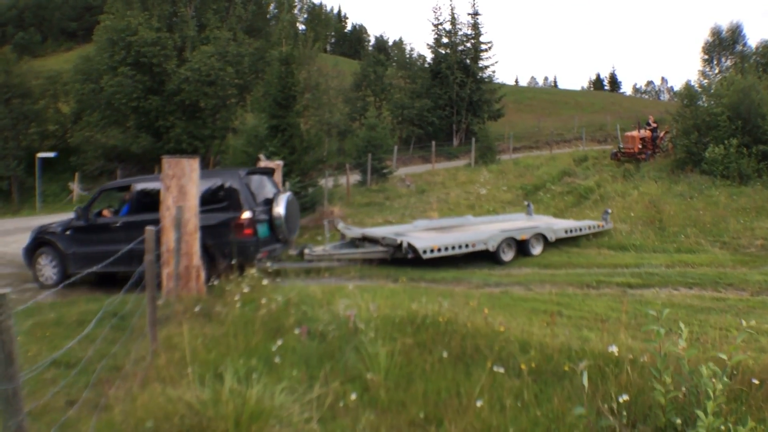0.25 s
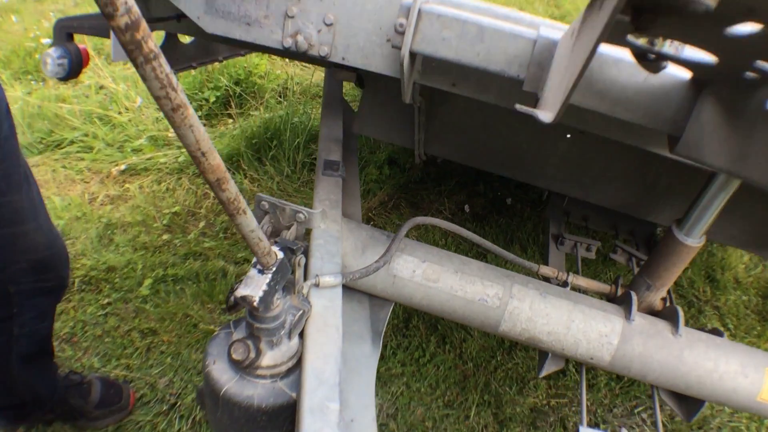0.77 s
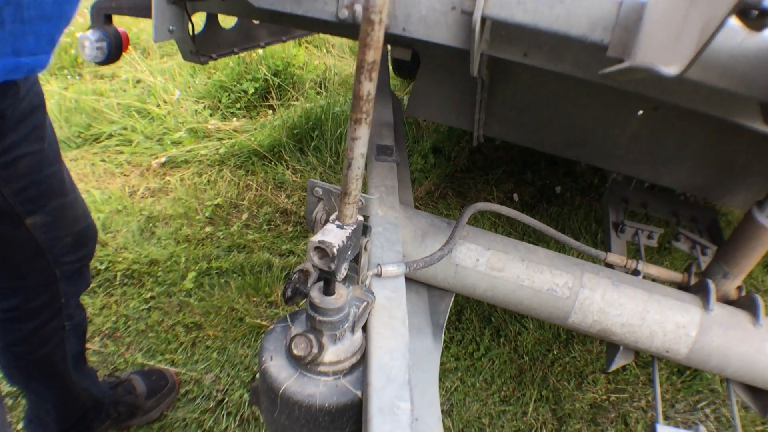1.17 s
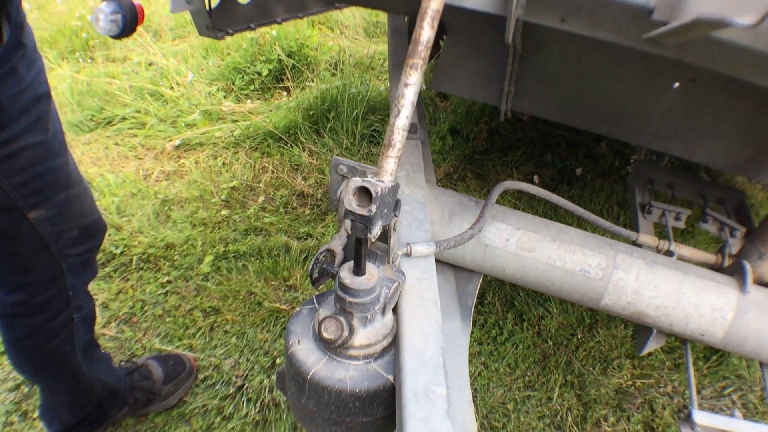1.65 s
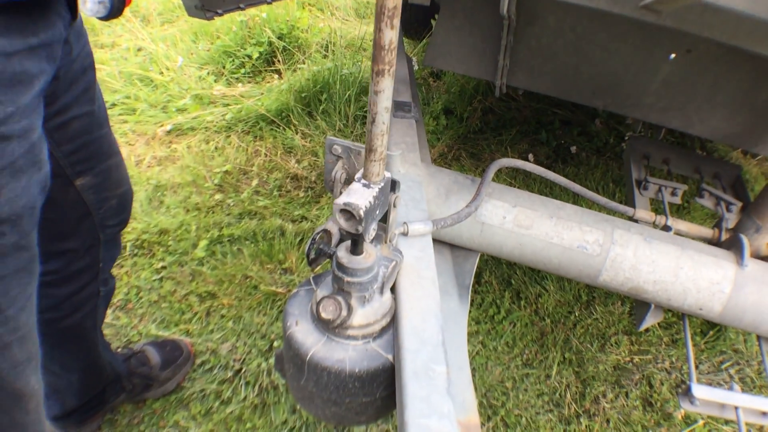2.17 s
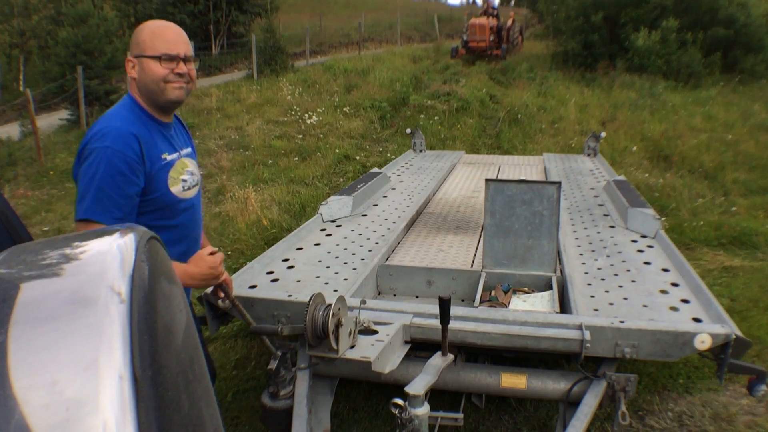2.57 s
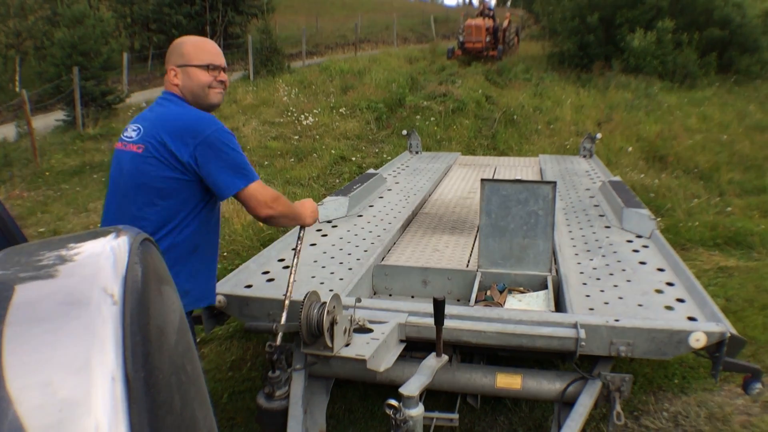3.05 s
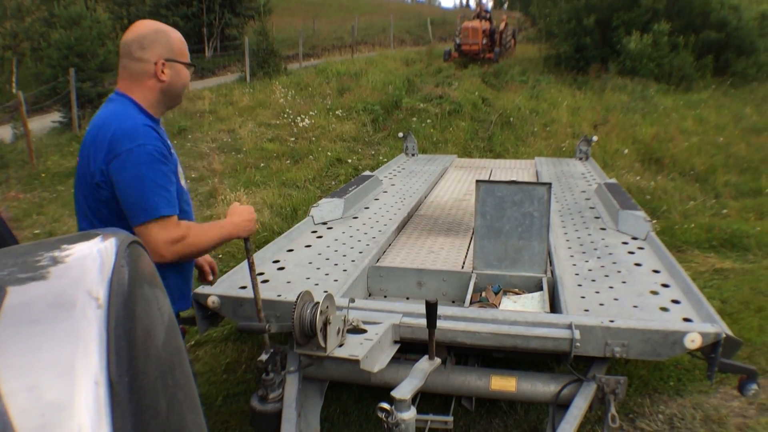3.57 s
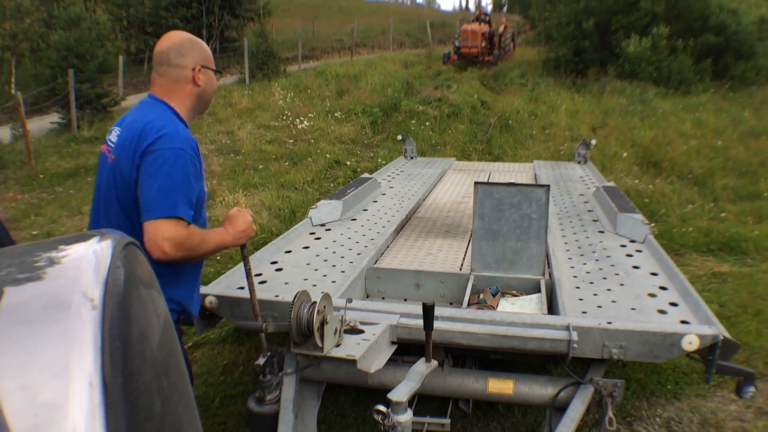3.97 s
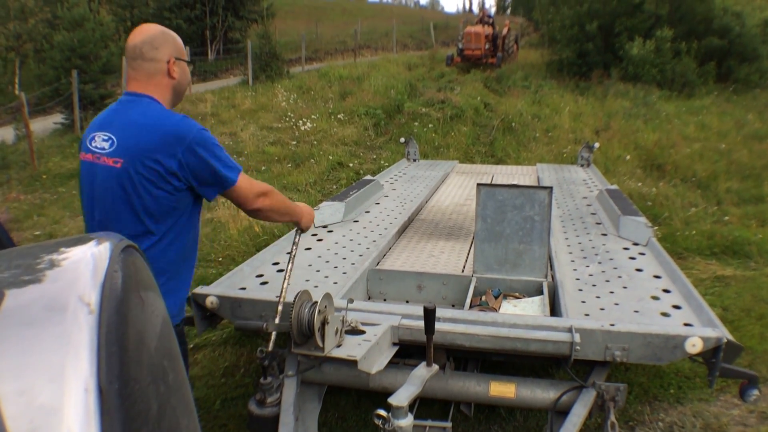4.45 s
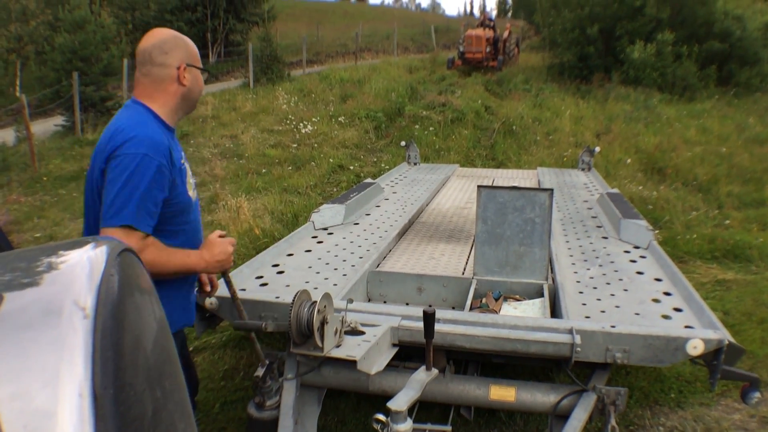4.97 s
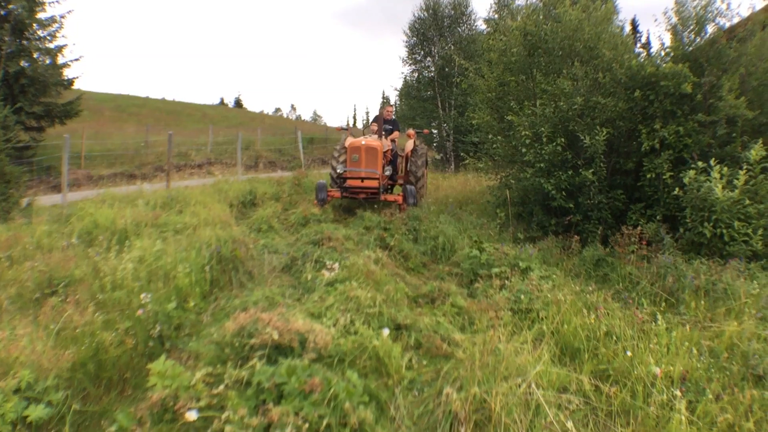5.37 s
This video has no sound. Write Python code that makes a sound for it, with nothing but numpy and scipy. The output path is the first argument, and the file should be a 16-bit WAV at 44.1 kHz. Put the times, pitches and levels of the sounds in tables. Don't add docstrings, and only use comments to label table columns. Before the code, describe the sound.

At 0 s the tail of a heavy blow rings through a steel trailer, with rattling loose parts and low engine thumps, fading by about 0.7 s. From 0.5 s a hydraulic hand pump is worked close by. The first push squeals piercingly around 5 kHz, falling in pitch, and a clank follows near 0.77 s. Oil hisses and chatters like a fast buzz, swelling with each stroke. Lower, weaker squeaks come on the pulls near 1.25, 2.95 and 4.1 s; higher squeals on the pushes near 1.9, 2.45, 3.6 and 4.65 s, with a very shrill one at 4.2 s. Knocks and bright pin ticks mark the reversals, notably at 1.57, 2.1, 2.6, 3.36, 3.8, 4.47, and strongest at 4.84 and 4.98 s. Faint wind, creaking steel and, from about 2.8 s, a barely audible distant idling engine remain underneath. A weak last squeak and tap close it by 5.4 s. The open air adds no room echo.

```python
import sys
import numpy as np
from scipy import signal
from scipy.fft import rfft, irfft
from scipy.io import wavfile
from scipy.ndimage import uniform_filter1d

SR = 44100
rng = np.random.default_rng(int(sys.argv[2]) if len(sys.argv) > 2 else 0)


def dump_mix(stems):
    frames = np.atleast_2d(stems).T
    limited = np.clip(frames, -1, 1)
    pcm = np.round(limited * 32767).astype(np.int16)
    wavfile.write(sys.argv[1], SR, pcm)


def voltage_ratio(level):
    return 10 ** (np.asarray(level, float) / 20)


N = 247401
T = np.arange(N) / SR
# [f/Hz, level/dB]
LOW = [(13, -38), (22, -20.5), (59, 7), (103, 3.5), (146, 0.5), (249, -17.5), (300, -6.5), (390, -47.5),
       (660, -120)]


def squeals():
    # [f/Hz, level/dB, t60/s]
    frame_modes = [(3778, -3, .25), (3915, -9, 0.18), (4190, -4.5, 0.27), (4230, -6, 0.3), (4580, 1, 0.23),
                   (4680, -2.5, 0.16), (4880, -1, 0.16), (5070, 0, 0.23), (5130, -4.5, 0.21),
                   (5275, -5, 0.12), (5430, 0.5, 0.22), (6140, -7, .3), (6350, -11, 0.31),
                   (10300, 1.5, 0.14)]
    dry_tones = pivot_tones() + groans()
    t = np.arange(SR // 3) / SR
    frame = np.zeros(len(t))
    for hz, db, t60 in frame_modes:
        pair = np.cos(2 * np.pi * hz * t) + voltage_ratio(-9) * np.cos(2 * np.pi * 1.006 * hz * t)
        frame += voltage_ratio(db - 60 * t / t60) * pair * 2 * np.log(1000) / (t60 * SR)
    scatter = burst([[(6600, -3.5), (9000, -7.5)]], t, 0.16, 0.00299)
    scatter /= np.linalg.norm(scatter)
    steel_response = voltage_ratio(1.0) * frame + voltage_ratio(-7.0) * scatter
    return voltage_ratio(-1.0) * dry_tones + signal.fftconvolve(dry_tones, steel_response)[:N]


def pivot_tones():
    # [t/s, f/Hz]
    push_curves = [
        [(.554, 5330), (.57, 5514), (.586, 5250), (.61, 5282), (.648, 5276), (.682, 5082), (.69, 4887),
         (.703, 4490)],
        [(1.79, 5307), (1.865, 5254)],
        [(1.894, 5293), (1.934, 5275), (1.942, 5205), (1.975, 5222)],
        [(2.402, 5280), (2.42, 5310), (2.426, 5420), (2.439, 5420), (2.445, 5270), (2.47, 5186), (2.493, 5275),
         (2.517, 5170), (2.574, 4715)],
        [(3.552, 5250), (3.567, 5290), (3.573, 5440), (3.582, 5413), (3.586, 5250), (3.645, 5170), (3.7, 4904),
         (3.723, 4880), (3.752, 4420)],
        [(4.612, 4950), (4.628, 5105), (4.65, 5160), (4.668, 5316), (4.7, 5310)],
    ]
    # [t/s, f/Hz]
    pull_curves = [
        [(1.213, 4050), (1.24, 4000), (1.252, 3905), (1.264, 3943), (1.3, 3894)],
        [(2.271, 4100), (2.302, 4130)],
        [(2.909, 4100), (2.922, 3910), (2.934, 3950), (2.946, 3916), (2.966, 3840), (2.98, 4010), (2.985, 3807),
         (3.03, 3763), (3.11, 3863)],
        [(4.041, 3940), (4.051, 3968), (4.085, 3900), (4.103, 3890), (4.112, 4170), (4.125, 4075), (4.2, 4075),
         (4.275, 4065)],
        [(4.198, 6280), (4.212, 6425), (4.238, 6372), (4.25, 6585), (4.262, 6470), (4.285, 6470)],
        [(5.141, 4090), (5.155, 3980), (5.177, 3875), (5.213, 3976), (5.26, 3915)],
        [(5.252, 4140), (5.265, 4236), (5.3, 4200), (5.33, 4240), (5.39, 4230)],
    ]
    # [t/s, level/dB, rise/s, fall/s], rise and fall over 20 dB
    grips = [(.566, -38, 0.012, 0.13), (0.604, -14.5, 0.015, 0.032), (0.64, -13, 0.04, 0.11),
             (0.655, -12.5, 0.05, 0.06), (0.686, -15.5, 0.03, 0.019), (1.224, -26, 0.006, 0.034),
             (1.248, -22.5, 0.012, 0.02), (1.265, -22.5, 0.04, 0.014), (1.295, -43, .02, 0.024),
             (1.824, -29, 0.033, 0.019), (1.915, -13, 0.013, 0.055), (1.931, -16, 0.024, 0.02),
             (1.958, -23, .03, 0.024), (2.278, -51.5, 0.056, 0.05), (2.416, -25.5, 0.012, 0.11),
             (2.432, -24.5, .03, 0.012), (2.449, -21, 0.015, 0.029), (2.488, -18.5, 0.017, 0.061),
             (2.565, -31.5, 0.2, 0.065), (2.924, -33, 0.013, 0.051), (2.968, -37.5, .03, 0.034),
             (2.988, -33, 0.008, 0.023), (3.013, -38.5, 0.022, 0.032), (3.05, -49, 0.039, 0.027),
             (3.568, -19, .015, 0.033), (3.581, -12, 0.014, 0.056), (3.597, -10.5, 0.028, 0.038),
             (3.622, -18, .03, 0.012), (3.658, -18, 0.041, 0.06), (3.73, -28, 0.24, 0.27),
             (4.05, -37, 0.021, 0.23), (4.115, -31.5, .02, 0.066), (4.168, -27.5, 0.022, 0.056),
             (4.197, -39, .03, 0.086), (4.213, -20, .007, .03), (4.227, -10.5, 0.02, 0.016),
             (4.251, -24, .02, 0.014), (4.27, -14.5, 0.011, 0.011), (4.63, -15.5, 0.013, 0.024),
             (4.653, -16, 0.023, 0.023), (4.669, -7.5, 0.009, 0.012), (5.154, -36.5, 0.0075, 0.049),
             (5.19, -36, 0.048, 0.025), (5.214, -31, 0.043, 0.082), (5.269, -40, .02, .04),
             (5.3, -33.5, .035, 0.032), (5.36, -56, .04, 0.03)]
    # [f/Hz, second/dB, third/dB, growth/dB per dB of bite]
    overtones = [(3996, -11, -27.5, -0.22), (4130, -14.5, -30, 0.1), (4865, -7, -20, 1.5),
                 (5080, -29.5, -30, 0.5), (5420, -29, -48.5, -0.27), (5420, -34, -42, -0.5),
                 (6400, -22.5, -64, -0.5)]
    smooth_s = .006
    out = np.zeros(N)
    curves = sorted(push_curves + pull_curves)
    starts = [curve[0][0] for curve in curves]
    owner = np.searchsorted(starts, [grip[0] for grip in grips]) - 1
    for k, curve in enumerate(curves):
        t = np.arange(starts[k], curve[-1][0], 1 / SR)
        hz = uniform_filter1d(column(curve, index=1, t=t), size=round(smooth_s * SR / 2))
        db = uniform_filter1d(swells(np.array(grips)[owner == k], t), size=round(smooth_s * SR))
        upper_db = db + column(overtones, index=3, t=hz) * (db + 19)
        second_db = upper_db + column(overtones, index=1, t=hz)
        third_db = upper_db + column(overtones, index=2, t=hz)
        partials_db = [db, second_db, third_db, third_db - 6.5]
        if hz[0] < 4500:
            tone = slip(hz, partials_db, flutter_db=2.2, wobbles=.002)
        else:
            tone = slip(hz, partials_db)
        add(out, starts[k], tone)
    return out


def groans():
    # [t/s, length/s, f/Hz, level/dB]
    groan_events = [
        (3.045, 0.029, 1790, -59),
        (3.427, 0.035, 1066, -43),
        (4.187, 0.086, 1065, -60),
        (4.193, 0.046, 1572, -60.5),
        (5.247, 0.075, 1760, -71),
    ]
    out = np.zeros(N)
    for start, length, hz, db in groan_events:
        u = np.arange(0, 1, 1 / (length * SR))
        level_db = db + abs(2 * u ** 0.51 - 1)
        add(out, start, slip(hz + 0 * u, [level_db], flutter_db=2.5, wobbles=.012))
    return out


def slip(hz, partials_db, flutter_db=.4, wobbles=.0005):
    wobble = wander(SR // 4, 200)[:len(hz)]
    flutter = wander(SR // 4, 200)[:len(hz)]
    turns = 2 * np.pi * np.cumsum(hz * (1 + wobbles * wobble)) / SR
    tone = np.zeros(len(hz))
    for k, db in enumerate(partials_db):
        partial_flutter_db = flutter_db + 2.6 * min(k, 1)
        tone += voltage_ratio(db + partial_flutter_db * flutter) * np.sin((k + 1) * turns)
    return np.sqrt(2) * tone * signal.windows.tukey(len(hz), .1)


def oil():
    # [f/Hz, level/dB]
    jet = [(1500, -29), (3200, -10.5), (4600, -1.5), (5200, -1.5), (5900, -4.5), (6700, -3), (7400, -6),
           (8200, -4.5), (8800, -6.5), (9500, -5.5), (10400, -23.5), (12800, -39.5), (14000, -17),
           (16000, -22)]
    # [f/Hz, half width/Hz, level/dB]
    hose_peaks = [(3500, 130, -1.5), (5900, 150, 10.5), (7400, 320, 3.5), (8500, 350, 8)]
    # [f/Hz, level/dB]
    spray = [(8500, -18), (10500, -2), (12500, -23.5), (14000, -8)]
    rate, clean, flow_db = lever()
    clean = np.clip(clean, 0, 1)
    colour_wander, patches = wander(N, 1500), wander(N, 1500)
    turns = 2 * np.pi * np.cumsum(rate) / SR
    pulses = sum(np.cos(k * turns + 0.015 * k * k) for k in range(5, 48))
    drive = clean * evened(pulses) + np.sqrt(1 - clean ** 2) * rng.standard_normal(N)
    hz, colour_db = steel(2.2, 140).T
    colour_db = colour_db + read(jet, hz)
    for peak_hz, width_hz, db in hose_peaks:
        colour_db += db * np.exp(-((hz - peak_hz) / width_hz) ** 2)
    stretch = (rate / 325) ** 0.27 * (1 + .015 * colour_wander)
    hose = coloured(drive, np.transpose([hz, colour_db]), stretch)
    spray_db = np.where(T < 2.42, -12, -22)
    hose += voltage_ratio(spray_db) * lumpy(spray, 1.5, size=600)
    return voltage_ratio(flow_db + 2.4 * patches + 9.5) * hose * np.clip((T - .4) / 0.1, 0, 1)


def lever():
    # [t/s, length/s, top chatter rate/Hz, clean share 0-1, oil flow/dB]
    pushes = [
        (.49, .28, 318, .72, -64),
        (1.62, .405, 280, .55, -65.5),
        (2.31, .3, 313, .78, -71),
        (3.41, .36, 320, .82, -66),
        (4.51, .33, 328, .9, -64.5),
    ]
    # [t/s, length/s, top chatter rate/Hz, clean share 0-1, oil flow/dB]
    pulls = [
        (.78, .22, 260, .1, -71),
        (2.13, .225, 325, .4, -60),
        (2.75, .46, 329, .76, -64),
        (3.92, .44, 331, .7, -63),
        (5.01, .42, 335, .66, -67),
        (.96, .505, 305, .62, -61.5),
    ]
    rest_hz, rest_clean = 184.4, .08
    start, length, top_hz, top_clean, db = np.transpose(pushes + pulls)[:, :, None]
    u = np.clip((T - start) / length, 0, 1)
    after = np.maximum(T - start - length, 0)
    push = np.sin(np.pi / 2 * np.minimum(u / .55, 1)) * np.clip(1 - after / .06, 0, 1)
    pull = abs(np.sin(np.pi * u ** 1.25)) ** .55
    pushing = np.arange(len(u))[:, None] < len(pushes)
    speed = np.where(pushing, push, pull)
    rate = rest_hz + (top_hz - rest_hz) * speed
    clean = rest_clean + (top_clean - rest_clean) * speed ** 2
    drain_db = 400 * np.maximum(start - T, after)
    flow_db = db - 9.5 * (1 - speed) - drain_db
    return rate.max(0), clean.max(0), flow_db.max(0)


def whistle():
    # [t/s at the top, f/Hz, level/dB]
    arches = [
        (0.795, 15650, -59),
        (.95, 14750, -66),
    ]
    reach_s, sag_hz_per_s2, fade_db_per_s2 = 0.085, 260000, 898
    s, top_hz, db = np.transpose(arches)[:, :, None]
    jitter = evened(uniform_filter1d(rng.standard_normal(N), size=100))
    hz = (top_hz - sag_hz_per_s2 * (T - s) ** 2).max(0) + 60 * jitter
    heard = (T > s.min() - reach_s) & (T < s.max() + reach_s)
    broken_db = 5 * evened(uniform_filter1d(rng.standard_normal(N), size=300)) - 5
    level_db = broken_db + (db - fade_db_per_s2 * (T - s) ** 2).max(0)
    return heard * np.sqrt(2) * voltage_ratio(level_db) * np.sin(2 * np.pi * np.cumsum(hz) / SR)


def linkage():
    return clanks() + plate_rings() + pin_ticks()


def clanks():
    # [t/s, body/dB, bright/dB above body, thump/dB above body]
    knocks = [(0.725, -52.5, -3, -8), (0.765, -25, -28, -13.5), (0.878, -35.5, -12, -5),
              (1.056, -53, -24, 6), (1.255, -47, -33, -11), (1.582, -35, -13.5, -6.5),
              (1.759, -64.5, -5, -2), (1.859, -45, -19, 5), (2.094, -36.5, -22, -1),
              (2.469, -44.5, -39, -10), (2.615, -32, -30, -16), (2.729, -41, -35, -4),
              (3.054, -45.5, -16, -16), (3.165, -39, -14, -11), (3.364, -31.5, -16.5, -7.5),
              (3.77, -29, -29, -11), (3.887, -30.5, -15, -6.5), (4.288, -34, -9.5, -11),
              (4.452, -42.5, -16, -16.5), (4.48, -36.5, -9.5, -4), (4.839, -24, -21, -13),
              (4.976, -29.5, -22, -13), (5.383, -48, -23, -26)]
    # [f/Hz, level/dB, t60/s]
    deck = [(364.3, 4, 0.62), (474, 4, 0.32), (895, 5.5, 0.52), (1111, 7.5, 0.58), (1250, -9, 0.16),
            (1625, -26, 0.27), (1770, -0.5, 0.96), (2115, 1, 0.17)]
    # [f/Hz, level/dB]
    body_colour = [(150, -49), (250, -21.5), (355, -36.5), (642, -0.5), (1130, -1.5), (2050, -8.5),
                   (2460, -14), (3710, -17.5), (4500, -50.5), (5850, -57.5), (9900, -120)]
    # [f/Hz, level/dB]
    bright_colour = [(2060, -13), (3500, -12), (5270, -9), (7850, -14), (10000, -42), (13000, -64),
                     (22000, -120)]
    # [f/Hz, level/dB]
    thump_colour = [(50, -23.5), (110, 7.5), (250, 1), (400, 4.5), (700, -41.5)]
    out, t = np.zeros(N), np.arange(SR // 2) / SR
    for s, db, bright_db, thump_db in knocks:
        plate, pins = steel(4, 60), steel(3, 200)
        body = burst([body_colour, plate], t, 0.32, 0.0003)
        body += voltage_ratio(-12.5) * burst([body_colour, plate], t, 0.8, 0.0029)
        body += voltage_ratio(1.0) * ring(deck, t, .4, 12) * (1 - np.exp(-t / 0.00027))
        body += voltage_ratio(thump_db + 9.0) * burst([thump_colour], t, 0.57, 0.05)
        bright = burst([bright_colour, pins], t, 0.18, 0.00033)
        add(out, s, voltage_ratio(db - 10.5) * (body + voltage_ratio(bright_db + 18.0) * bright))
    return out


def plate_rings():
    # [t/s, level/dB, f/Hz]
    plates = [(0.766, -22, 1240), (0.877, -34, 1190), (1.583, -30, 707), (2.1, -30, 760),
              (2.614, -31, 1350), (3.165, -41, 920), (3.364, -28.5, 880), (3.77, -28, 1860),
              (3.887, -31, 970), (4.288, -35, 1050), (4.48, -29.5, 950), (4.839, -24.5, 1890),
              (4.977, -26.5, 786)]
    out, t = np.zeros(N), np.arange(SR // 2) / SR
    for s, db, hz in plates:
        peak = [(hz / 1.9, -40), (hz, 0), (hz * 1.47, -40)]
        add(out, s, voltage_ratio(db - 14.0) * burst([peak], t, 0.27, 0.006))
    return out


def pin_ticks():
    # [t/s, level/dB, ring f/Hz, top/dB above level, top ring f/Hz]
    tick_events = [(0.849, -32.5, 6140, -25, 11040), (0.8796, -32.5, 6020, -14, 11040),
                   (1.0067, -50, 6840, 0, 14230), (1.5494, -33.5, 5920, -6, 15000),
                   (1.574, -33.5, 3770, -9, 14230), (2.0824, -21, 5900, -14, 14230),
                   (2.183, -37, 6070, -4, 14230), (2.384, -64, 5000, -10, 11040),
                   (2.707, -33.5, 7700, -12, 14230), (3.3565, -35, 5100, -1.5, 14230),
                   (3.374, -26.5, 5160, -16, 14230), (3.86, -26.5, 7800, -26, 14230),
                   (3.8688, -26, 5900, -2, 11040), (4.4495, -48, 9500, -6, 14000),
                   (4.471, -32, 5510, -3, 14400), (4.4727, -23.5, 4840, -16, 9500),
                   (4.954, -33, 7870, -21, 14230), (4.977, -33.5, 3450, -19, 9450)]
    # [f/Hz, level/dB]
    tick_colour = [(1470, -12), (2500, -14.5), (2940, -12.5), (5410, -3), (6000, 5), (10000, -14.5),
                   (13000, -67), (22000, -120)]
    # [f/Hz, level/dB]
    top_colour = [(8000, -24), (10000, -7.5), (12500, -11), (14500, -25), (16500, 5.5)]
    # [f/Hz, level/dB, t60/s]
    pin_modes = [(9500, -1.5, 0.06), (11040, -13, 0.049), (14230, -4, 0.06)]
    out, t = np.zeros(N), np.arange(SR // 2) / SR
    chatter = 1 / (1 + (t / 0.014) ** 6)
    for s, db, hz, top_db, top_hz in tick_events:
        pins = steel(3, 200)
        tick = burst([tick_colour, pins], t, 0.15, 0.0021) + voltage_ratio(5.5) * ring([(hz, 0, .05)], t, .06, 1.0)
        top = burst([top_colour, pins], t, .3, 0.0021)
        top += voltage_ratio(-4.5) * ring(pin_modes, t, 0.07, 8)
        top += voltage_ratio(-3.0) * ring([(top_hz, 0, .1)], t, .12, 2.4)
        add(out, s, voltage_ratio(db - 11.5) * (tick + voltage_ratio(top_db + 10.5) * chatter * top))
    return out


def taps():
    # [t/s, level/dB, centre f/Hz]
    tap_events = [
        (.729, -38.5, 2500),
        (1.06, -42.5, 2500),
        (1.757, -56, 2500),
        (2.386, -48, 4500),
        (2.432, -54, 3000),
        (2.667, -48, 3700),
        (4.9768, -30, 3400),
        (5.386, -42, 3000),
    ]
    out, t = np.zeros(N), np.arange(SR // 20) / SR
    for s, db, hz in tap_events:
        hump = [(hz / 4, -25), (hz / 2, -3), (hz, 0), (hz * 1.73, -4), (hz * 3, -30)]
        add(out, s, voltage_ratio(db) * burst([hump], t, 0.015, 0.0011))
    return out


def clear_notes():
    # [t/s, level/dB, f/Hz, t60/s]
    note_events = [(0.02, -19, 74.6, 0.44), (.03, -40, 360, 0.078), (0.151, -36, 74, 0.26),
                   (0.154, -20, 103, .12), (.19, -30.5, 108.4, .5), (.34, -33, 69.4, 0.3),
                   (.767, -40, 1144, 0.096), (.767, -35, 1930, 0.11), (.77, -47, 365, .2),
                   (1.556, -47, 3100, 0.14), (1.556, -52, 11250, 0.066), (1.6, -49, 815, 0.1),
                   (2.076, -41, 700, 0.15), (2.082, -57, 3025, 0.066), (2.09, -42, 1216, 0.19),
                   (2.103, -40, 917, .1), (2.115, -46.5, 241, 0.41), (2.155, -43.5, 197, 0.34),
                   (2.18, -53, 2850, .12), (3.052, -47, 700, 0.1), (3.15, -48, 905, 0.31),
                   (3.165, -49, 2340, 0.14), (3.36, -53, 890, 0.14), (3.375, -44, 1080, 0.17),
                   (3.46, -40.5, 123, 0.37), (3.52, -50, 444, 0.22), (3.772, -32, 1370, 0.11),
                   (3.772, -50, 895, 0.33), (3.772, -42, 1614, .19), (3.772, -44.5, 361, .28),
                   (3.89, -37.5, 988, 0.29), (4.84, -51, 890, 0.19), (4.84, -33.5, 1374, .16),
                   (4.84, -39, 1610, 0.17), (4.84, -40.5, 2110, .2), (4.84, -35, 3370, .06),
                   (4.845, -42.5, 368, 0.42), (4.978, -35, 865, .14), (4.978, -35, 1022, 0.11),
                   (4.978, -43.5, 684, .28), (4.978, -52, 1460, .3), (4.955, -54, 10800, .1)]
    out, t = np.zeros(N), np.arange(SR // 3) / SR
    for s, db, hz, t60 in note_events:
        pair = np.sin(2 * np.pi * hz * t) + .4 * np.sin(2 * np.pi * 1.03 * hz * t)
        swell = 1 - np.exp(-t * hz / 2)
        add(out, s, voltage_ratio(db - 60 * t / t60) * pair * swell)
    return out


def slam():
    # [t/s, level/dB, rise/s, fall/s], rise and fall over 20 dB
    thumps = [
        (.03, -25.5, 0.043, 0.15),
        (.17, -24.5, 0.062, 0.21),
        (.35, -33.5, 0.11, 0.11),
        (.47, -39, 0.18, 0.32),
    ]
    # [t/s, level/dB, rise/s, fall/s]
    rattles = [
        (0, -31, .01, 0.19),
        (.16, -45, 0.62, 0.47),
    ]
    # [f/Hz, level/dB]
    rumble_colour = [(20, -8), (36, 2.5), (74, 3), (110, 0), (170, -6), (340, -18), (600, -53)]
    # [f/Hz, level/dB]
    rattle_colour = [(250, -37), (500, -5), (750, -0.5), (1400, -7.5), (2300, -8), (5200, -6.5),
                     (8000, -17), (11000, -34), (16000, -37)]
    # [f/Hz, level/dB, t60/s]
    gate_modes = [(645, -16, 1), (700, -2, 0.58), (751, 2, 0.62), (850, -7, 0.27), (1080, -5.5, 0.2),
                  (2270, 1, 0.38), (2303, -10, 0.28), (2520, 4, 0.11), (3025, 6, 0.13), (3420, 0.5, 0.21),
                  (4050, 4.5, 0.11), (4290, 3, 0.13), (4580, 5.5, 0.1), (5250, 1, 0.092)]
    fade = np.clip((.8 - T) / 0.14, 0, 1)
    jolt_hz = 34 + 5 * lumpy(LOW, 0, size=99)
    jolts = 1 + 0.29 * np.maximum(np.cos(2 * np.pi * np.cumsum(jolt_hz) / SR), 0) ** 5
    rattle = voltage_ratio(swells(rattles, T) + 3.0) * lumpy(rattle_colour, 0.29, size=200) * jolts
    rumble = voltage_ratio(swells(thumps, T)) * lumpy(rumble_colour, 0.25, size=700)
    gate = voltage_ratio(-33.0) * ring(gate_modes, T, 0.71, 0.17) * voltage_ratio(3.35 * lumpy(LOW, 0, size=99))
    return (rattle + rumble) * fade + gate


def surroundings():
    # [t/s, creak/dB]
    load = [(.6, -52.5), (1.06, -71.5), (1.3, -56), (1.76, -57.5), (2.15, -59.5), (2.38, -64.5), (2.6, -58),
            (2.86, -70), (3.3, -63.5), (3.5, -52), (3.9, -59), (4.15, -64.5), (4.4, -62), (4.55, -49.5),
            (4.95, -59.5), (5.2, -64), (5.44, -69.5)]
    # [f/Hz, level/dB]
    creak_colour = [(90, -21.5), (160, -4.5), (520, -3.5), (1100, -14), (1800, -18), (3000, -28.5),
                    (5000, -69.5)]
    # [t/s, level/dB]
    idle_levels = [
        (2.5, -88.5),
        (2.85, -63),
        (4.9, -60.5),
        (5.3, -63),
        (5.5, -71),
    ]
    # [f/Hz, level/dB]
    air_colour = [(200, -29.5), (500, -22.5), (950, -2.5), (2500, -8.5), (6000, -0.5), (9000, -11.5),
                  (16000, -18.5)]
    start, load_db = np.clip(T / 0.82, 0, 1), column(load, index=1)
    end_db = -6.5 * np.clip((T - 5.33) / 0.13, 0, 1)
    low_db = -58.5 + 0.35 * (load_db - load_db.mean()) + end_db
    low = voltage_ratio(low_db) * lumpy(LOW, 1.5, size=1500)
    beams = steel(2.2, 45)
    creak = voltage_ratio(load_db + 1.5) * through(lumpy(creak_colour, 1.4, size=500), beams)
    idle = voltage_ratio(column(idle_levels, 1)) * np.sin(2 * np.pi * 44.0 * T) * (1 + .3 * np.sin(2 * np.pi * 7.6 * T))
    air = voltage_ratio(-65.0) * lumpy(air_colour, 1.4, size=900)
    return start * (low + creak) + np.sqrt(2) * idle + air


def evened(x):
    return x / np.sqrt(np.mean(x ** 2) + 1e-20)


def wander(length, size):
    return evened(uniform_filter1d(uniform_filter1d(rng.standard_normal(length), size), size))


def read(points, hz):
    f, value = np.transpose(points)
    return np.interp(np.log(hz + 1), np.log(f + 1), value)


def column(rows, index, t=T):
    rows = np.asarray(rows, float)
    return np.interp(t, rows[:, 0], rows[:, index])


def swells(rows, t):
    s, db, rise, fall = np.transpose(rows)[:, :, None]
    return (db - 20 * np.maximum((s - t) / abs(rise), (t - s) / abs(fall))).max(0)


def add(mix, s, sound):
    part = mix[round(s * SR):][:len(sound)]
    part += sound[:len(part)]


def through(x, *spectra):
    hz = np.fft.rfftfreq(len(x), 1 / SR)
    gain_db = sum(read(points, hz) for points in spectra)
    return evened(irfft(rfft(x) * voltage_ratio(gain_db), len(x)))


def coloured(x, points, stretch):
    hz, t, z = signal.stft(x, SR, nperseg=512, noverlap=384)
    slide = np.interp(t, T, stretch)
    gain = voltage_ratio(read(points, hz[:, None] / slide))
    return evened(signal.istft(z * gain, SR, nperseg=512, noverlap=384)[1][:len(x)])


def lumpy(points, lumps_db, size):
    lumps = wander(N, size)
    return evened(through(rng.standard_normal(N), points) * voltage_ratio(lumps_db * lumps))


def burst(spectra, t, t60, rise):
    return through(rng.standard_normal(len(t)), *spectra) * voltage_ratio(-60 * t / t60) * (1 - np.exp(-t / rise))


def ring(modes, t, shorten, spread_db):
    hz, db, t60 = np.transpose(modes)[:, :, None]
    luck = rng.random((2, len(modes), 1))
    level_db = db + spread_db * (luck[0] - 2.0) - 60 * t / np.minimum(t60, shorten)
    return (voltage_ratio(level_db) * np.sin(2 * np.pi * (hz * t + luck[1]))).sum(0)


def steel(depth_db, width_hz):
    hz = np.arange(width_hz, SR / 2, width_hz)
    return np.transpose([hz, depth_db * rng.standard_normal(len(hz))])


def scene():
    pump = squeals() + whistle() + oil()
    trailer = linkage() + taps() + clear_notes() + slam()
    return (pump + trailer + surroundings())[None]


def band_limit(x):
    return signal.sosfilt(signal.butter(12, 16730, fs=SR, output="sos"), x)


def record(dry):
    lowpass = signal.firwin(1201, 16000, window=("kaiser", 8), fs=SR)
    limited = signal.oaconvolve(dry, lowpass[None], "same")
    return band_limit(limited)


dry = scene()
out = record(dry)
dump_mix(out)
```